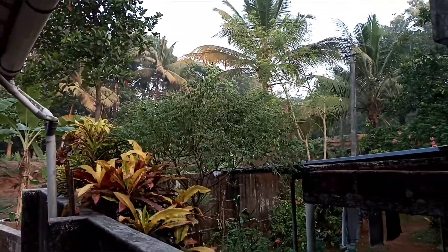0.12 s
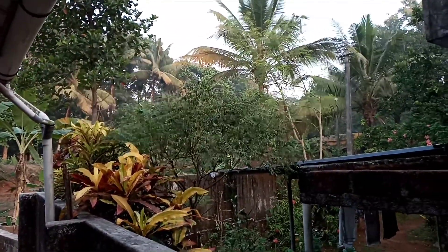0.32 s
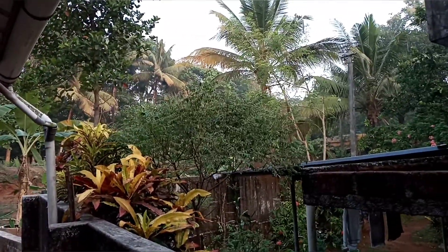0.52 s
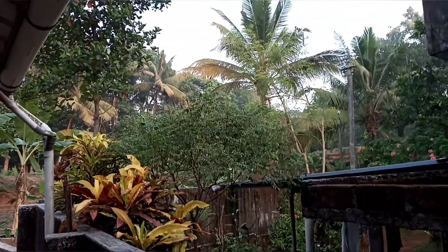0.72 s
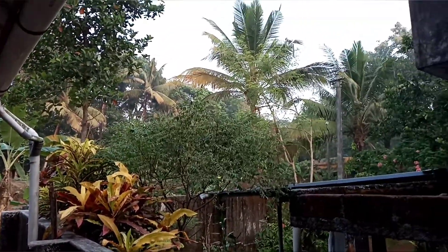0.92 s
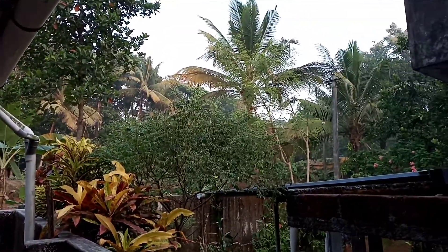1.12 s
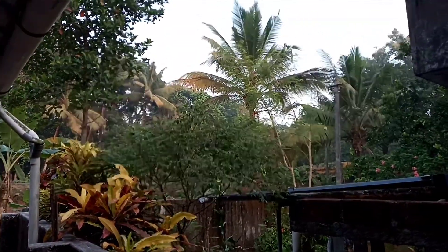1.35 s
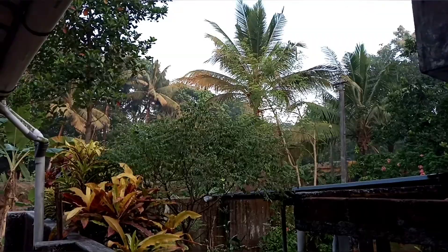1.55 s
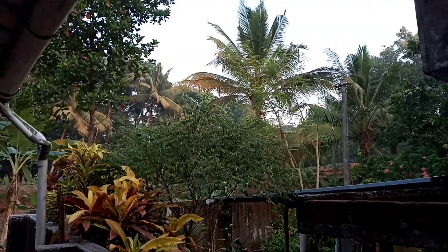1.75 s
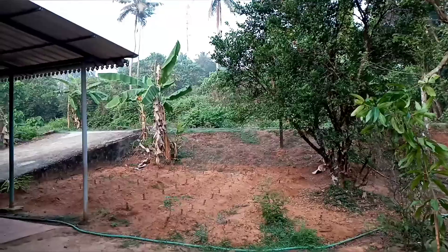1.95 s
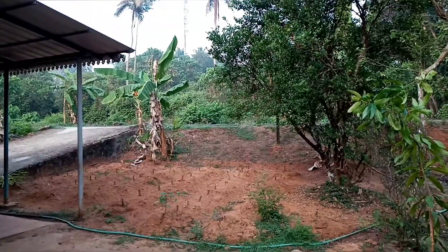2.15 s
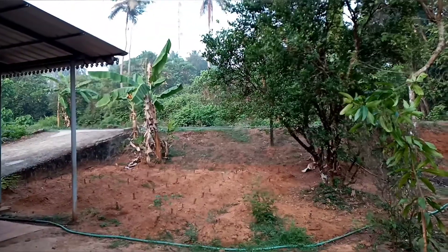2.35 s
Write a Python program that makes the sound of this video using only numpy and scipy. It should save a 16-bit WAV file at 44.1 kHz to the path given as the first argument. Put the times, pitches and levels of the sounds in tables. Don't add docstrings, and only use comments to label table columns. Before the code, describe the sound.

Small birds whistle and chirp in a leafy yard while a finger rubs and taps the phone

```python
import sys
import numpy as np
from scipy import signal
from scipy.fft import rfft, irfft
from scipy.io import wavfile

SR = 44100
rng = np.random.default_rng(int(sys.argv[2]) if len(sys.argv) > 2 else 0)


def wrap_up_sound(samples):
    columns = np.atleast_2d(samples).T
    tamed = np.clip(columns, -1, 1)
    steps = np.round(tamed * 32767).astype(np.int16)
    wavfile.write(sys.argv[1], SR, steps)


def magnitude_from_level(level_db):
    exponent = np.asarray(level_db, float) / 20
    return 10 ** exponent


N = 108045
CHANGE_S = 1.92
BURR = .8


def t():
    return np.arange(N) / SR


def rms_one(x):
    return x / np.sqrt(np.mean(x ** 2) + 1e-20)


def drift(rate_hz, size=N):
    r = np.exp(-2 * np.pi * rate_hz / SR)
    wander = signal.lfilter([1], [1, -2 * r, r * r], rng.standard_normal(size + SR))
    return rms_one(wander[SR:])


def band(x, low_hz, high_hz, order=2):
    limits = [low_hz, min(high_hz, .45 * SR)]
    return signal.sosfilt(signal.butter(order, limits, "band", fs=SR, output="sos"), x)


def noise_band(low_hz, high_hz, order=2):
    return rms_one(band(rng.standard_normal(N), low_hz, high_hz, order))


def colour(x, points):
    hz, db = np.transpose(points)
    grid = np.maximum(np.arange(N // 2 + 1) * SR / N, 1)
    gain = magnitude_from_level(np.interp(np.log(grid), np.log(hz), db))
    return rms_one(irfft(rfft(x) * gain, N))


def ring(x, hz, t60):
    r = magnitude_from_level(-60 / (t60 * SR))
    w = 2 * np.pi * hz / SR
    return signal.lfilter([0, np.sin(w)], [1, -2 * r * np.cos(w), r * r], x + 1e-18)


def grains(per_s, spread_db):
    happens = rng.random(N) < per_s / SR
    size = magnitude_from_level(spread_db * np.minimum(rng.exponential(1, N), 4))
    return happens * size * rng.choice([-1, 1], N)


def gate(start, length, edge):
    to_edge = np.minimum(t() - start, start + length - t())
    return np.sin(np.pi / 2 * np.clip(to_edge / edge, 0, 1)) ** 2


def levelled(rows, levels_db):
    return [(*row, db) for row, db in zip(rows, levels_db)]


def glides(rows):
    out = 0
    waver = magnitude_from_level(2 * drift(50))
    for start, length, from_hz, to_hz, db in rows:
        hz = np.interp(t(), [start, start + length], [from_hz, to_hz])
        tone = np.sin(2 * np.pi * np.cumsum(hz) / SR)
        out = out + np.sqrt(2) * magnitude_from_level(db) * gate(start, length, 0.0028) * tone
    return out * waver


def air():
    # f/Hz, level/dB
    air_colour = [(25, -33), (70, 2), (190, -1), (330, -17.5), (650, -11), (2000, -13.5), (3800, -19),
                  (8000, -44)]
    hiss = colour(rng.standard_normal(N), air_colour)
    edges = 20 * 2. ** np.arange(11)
    octaves = [band(hiss, low, high) * magnitude_from_level(drift(7.6)) for low, high in zip(edges, edges[1:])]
    return magnitude_from_level(-64) * sum(octaves)


def motor():
    hum_hz, width_hz = 181.4, 22.3
    return magnitude_from_level(-73) * noise_band(hum_hz - width_hz / 2, hum_hz + width_hz / 2)


def traffic():
    murmur_hz, width_hz = 300.4, 144
    swell = magnitude_from_level(-74 + 1.5 * drift(8.5))
    return swell * noise_band(murmur_hz - width_hz / 2, murmur_hz + width_hz / 2)


def wind():
    # t/s, level/dB
    gusts = [
        (1.92, -54.5),
        (2.06, -67),
        (2.12, -62),
        (2.28, -62),
        (2.45, -70.5),
    ]
    strength = magnitude_from_level(np.interp(t(), *np.transpose(gusts)) + 0.5 * drift(13))
    return strength * noise_band(47, 136)


def insects():
    # f/Hz, width/Hz, level/dB, throb rate/Hz, throb depth/dB, time of one throb peak/s
    insect_bands = [(4693, 420, -73, 0.97, -0.5, 0.13), (6228, 247, -66.5, 6.3, -0.5, 0.34),
                    (6607, 120, -69.5, 9.0, 2, 0.08), (7893, 220, -74.5, 10.9, 7.0, 0.544),
                    (7540, 570, -76, 3.8, 1, 0.15), (9020, 110, -77.5, 11, 3.5, 0.56),
                    (8864, 390, -72, 18, 3, 0.065), (9190, 55, -74, 11, 4, .48),
                    (6316, 20, -73, 5.02, 0.5, .45), (9096, 720, -66.5, 10.6, 2, 0.459)]
    out = 0
    for hz, width_hz, db, rate, depth_db, peak_s in insect_bands:
        clicks = grains(5800, 0.69)
        song = rms_one(band(clicks, hz - width_hz / 2, hz + width_hz / 2))
        throb_db = depth_db * np.cos(2 * np.pi * rate * (t() - peak_s))
        out = out + song * magnitude_from_level(db + throb_db + 2.5 * drift(3.35))
    return out


def linger():
    # start t/s, low f/Hz, high f/Hz, time to fade 60 dB/s
    hanging = [(0.0, 1700, 2150, 1.0), (.33, 1400, 2450, 1.2), (.63, 1500, 2300, 1.3),
               (1.92, 1600, 2400, 1.5), (1.92, 2600, 3700, .5), (2.15, 1500, 2400, 1.3),
               (.72, 3000, 3800, .8), (1.72, 900, 2000, .4), (.735, 4900, 7300, .3), (.685, 5900, 6800, .6),
               (1.07, 5100, 6800, .6), (1.73, 250, 480, .9), (1.93, 1000, 1600, .8), (1.66, 2400, 3750, .5),
               (.2, 2700, 3750, .4), (.88, 2650, 2980, .9), (2.075, 3850, 4200, .9), (2.19, 4200, 5100, .6),
               (1.67, 3600, 3780, .8), (.745, 3550, 3750, .8)]
    hanging_db = [-67.5, -53.5, -52, -57, -67.5, -67, -69, -66, -56.5, -61.5, -62.5, -63, -75.5, -67, -67,
                  -65, -71, -74, -70, -68.5]
    out = 0
    for s, low_hz, high_hz, t60, db in levelled(hanging, hanging_db):
        fade_db = db - 60 * np.maximum(t() - s, 0) / t60
        fade = magnitude_from_level(fade_db + 2.0 * drift(22)) * gate(s, 3, 0.0046)
        out = out + fade * noise_band(low_hz, high_hz, order=5)
    return out


def crow():
    # t/s, f/Hz
    pitch = [
        (2.033, 505),
        (2.06, 538),
        (2.095, 550),
        (2.14, 536),
        (2.195, 505),
    ]
    # multiple of the pitch, level/dB
    partials = [(2, -67.5), (3, -54.5), (4, -50), (5, -88)]
    hz = np.interp(t(), *np.transpose(pitch)) + 7 * drift(152)
    phase = 2 * np.pi * np.cumsum(hz) / SR
    voice = 0
    for multiple, db in partials:
        rough = 1 + .4 * drift(130)
        voice = voice + np.sqrt(2) * magnitude_from_level(db) * np.sin(round(multiple) * phase) * rough
    return voice * gate(2.033, .165, .026)


def buzzer():
    # start t/s, length/s, level/dB
    rasps = [
        (0.696, 0.051, -67.5),
        (0.828, 0.13, -57),
        (1.042, 0.14, -55),
        (1.263, 0.08, -69.5),
        (1.45, 0.091, -69),
        (1.672, 0.15, -70.5),
    ]
    throat = rms_one(band(grains(1500, 0.94), 4190, 4960, order=3))
    return throat * sum(magnitude_from_level(db) * gate(s, length, 0.41 * length) for s, length, db in rasps)


def chirper():
    # start t/s, top f/Hz, level/dB
    chirps = [
        (0.189, 3682, -61),
        (0.74, 3600, -67),
        (1.034, 3840, -66),
        (1.649, 3716, -67.5),
    ]
    hold_s, fall_s = 0.019, 0.031
    held = [(s, hold_s, hz, hz * .97, db) for s, hz, db in chirps]
    held += [(s, hold_s * 2.1, 2 * hz, 2 * hz * .93, db - 3) for s, hz, db in chirps]
    drops = [(s + hold_s / 2, fall_s, hz, hz * .7, db - 10) for s, hz, db in chirps]
    return glides(held) * (1 + BURR * drift(150)), glides(drops)


def pipers():
    # start t/s, length/s, from f/Hz, to f/Hz
    piped = [(.555, .03, 2930, 3050), (.578, .05, 3080, 3130), (.635, .07, 3100, 3120),
             (.843, .055, 2690, 2760), (.895, .075, 2800, 2850), (.965, .07, 2830, 2770),
             (1.17, .05, 2500, 2450), (1.255, .025, 2330, 2310), (1.455, .09, 3510, 3500),
             (2.06, .03, 3900, 3980), (1.925, .1, 3620, 3580), (1.09, .07, 2200, 2200),
             (2.19, .17, 2580, 2600), (1.44, .06, 6800, 7000), (1.25, .1, 3000, 3350),
             (1.3, .04, 2450, 2150), (2.17, .055, 3900, 3850), (.63, .27, 2240, 2200),
             (1.89, .028, 5600, 5550), (1.0, .18, 1900, 1800)]
    piped_db = [-75, -69, -78, -66.5, -65, -71.5, -70.5, -67.5, -76, -73, -76.5, -72, -75, -68, -78.5, -71,
                -75.5, -69, -79, -75.5]
    return glides(levelled(piped, piped_db)) * (1 + BURR * drift(84))


def whistler():
    # start t/s, length/s, from f/Hz, to f/Hz
    whistled = [(0.0, .035, 1500, 1490), (.045, .07, 1500, 1500), (.153, .03, 1975, 1945),
                (.178, .016, 1930, 1740), (.19, .028, 1730, 1720), (.215, .02, 1740, 1880),
                (.23, .075, 1885, 1895), (.473, .04, 2050, 2210), (.508, .05, 2240, 2235),
                (.559, .018, 2190, 2160), (.576, .015, 2170, 2150), (.592, .024, 2090, 2070),
                (.616, .018, 2050, 2000), (.625, .03, 1900, 1600), (.65, .045, 1600, 1390),
                (.7415, .026, 1545, 1510), (.784, .034, 1520, 1520), (.825, .03, 1520, 1520),
                (.905, .04, 1520, 1520), (.955, .035, 1810, 1820), (1.853, .024, 2010, 2010),
                (1.874, .018, 2010, 1980), (1.885, .035, 1900, 1760), (.372, .15, 1480, 1510)]
    whistled_db = [-55.5, -63, -57.5, -49, -54.5, -71, -51.5, -55, -51.5, -53.5, -44.5, -48, -48.5, -62.5,
                   -67, -47, -49, -61, -71, -60, -60, -52, -56.5, -68]
    return glides(levelled(whistled, whistled_db))


def echoes(x):
    age = np.arange(SR) / SR
    clumps = rng.standard_normal(SR) * magnitude_from_level(1.5 * drift(52, size=SR))
    far_trees = magnitude_from_level(-60 * age / 0.95)
    near_trees = magnitude_from_level(13 - 60 * age / 0.11)
    tail = clumps * (far_trees + near_trees) * (age > 0.0053)
    tail = tail / np.sqrt(np.sum(tail ** 2))
    return magnitude_from_level(-2) * signal.fftconvolve(x, tail)[:N] * (1 + 0.14 * drift(45))


def finger_rub(slips):
    # t/s, level/dB
    pressure = [
        (0.253, -49.5),
        (0.265, -40),
        (0.283, -35),
        (0.34, -35.5),
        (0.341, -37),
        (0.358, -42),
        (.372, -45.5),
        (0.38, -49),
    ]
    # f/Hz, level/dB
    rub_colour = [(400, -19), (950, -15), (1400, -3), (2900, -1), (4900, -14), (6500, -13), (11000, -52),
                  (15400, -35)]
    s, db = np.transpose(pressure)
    rub = band(colour(slips, rub_colour), 110, 18000, order=1)
    dull_hz, dulls_s = 4400, .335
    treble = signal.sosfilt(signal.butter(3, dull_hz, "high", fs=SR, output="sos"), rub)
    bass = signal.sosfilt(signal.butter(3, dull_hz, fs=SR, output="sos"), rub)
    rub = bass + treble * np.interp(t(), [dulls_s, dulls_s + 0.0044], [1, .3])
    return rub * magnitude_from_level(np.interp(t(), s, db, left=-120, right=-120))


def skin_brushes(slips):
    # start t/s, length/s, low f/Hz, high f/Hz
    brushes = [
        (.353, .016, 4300, 6800),
        (.491, .017, 1150, 3300),
        (2.182, .007, 4200, 5400),
        (.36, .02, 1200, 4500),
    ]
    brushes_db = [-45, -55, -56, -58]
    out = 0
    for s, length, low_hz, high_hz, db in levelled(brushes, brushes_db):
        skin = rms_one(band(slips, low_hz, high_hz, order=3))
        out = out + skin * magnitude_from_level(db) * gate(s, length, length / 3)
    return out


def case_taps():
    # t/s, thump level/dB, click level/dB, click f/Hz
    taps = [
        (0.6562, -37, -70, 1240),
        (1.7145, -30.5, -28.5, 1290),
        (1.816, -47.5, -70, 1300),
        (1.918, -48.5, -57, 2970),
        (2.171, -99, -45, 2460),
        (2.443, -46, -77, 1324),
    ]
    soft = signal.butter(4, 520, fs=SR, output="sos")
    out = 0
    for s, thump_db, click_db, click_hz in taps:
        tap = 1. * (np.arange(N) == int(s * SR))
        thump = signal.sosfilt(soft, band(ring(tap, 355, .028), 70, 900, order=1))
        click = ring(tap, click_hz, 5.5 / click_hz)
        click = band(click, click_hz / 1.35, min(click_hz * 2, 6500), order=1 + (click_hz > 1600))
        out = out + magnitude_from_level(thump_db) * thump - magnitude_from_level(click_db) * click
    return out


def handling():
    slips = grains(15000, 2.5)
    return finger_rub(slips) + skin_brushes(slips) + case_taps()


def scene():
    first = t() < CHANGE_S
    second = ~first
    held, drops = chirper()
    birds = whistler() + pipers() + held + buzzer() + crow()
    first_echoes = echoes((birds + drops) * first) * first
    second_echoes = 0.67 * echoes(birds * second)
    far = birds + first_echoes + second_echoes + linger()
    far = far + (motor() + traffic()) * first + wind() * second
    far = far + insects() * magnitude_from_level(-7 * second) + air() * magnitude_from_level(-3 * second)
    treble_cut = signal.cheby2(10, 50, 9855 * 1.106, fs=SR, output="sos")
    mid = handling() + signal.sosfilt(treble_cut, far)
    return np.array([mid, mid])


def top_cut(x):
    return signal.sosfilt(signal.butter(12, 15990, fs=SR, output="sos"), x)


def record(dry):
    low = signal.sosfilt(signal.butter(2, 40, "high", fs=SR, output="sos"), dry)
    port_hz = 15150
    port = noise_band(port_hz - 700, port_hz + 700) * magnitude_from_level(-88.5 + 1.5 * drift(8))
    hiss_db = -101 + 6 * (t() > CHANGE_S) + 1.6 * drift(6)
    hiss = noise_band(11000, 12000, order=1) * magnitude_from_level(hiss_db)
    side = magnitude_from_level(-95) * noise_band(15000, 15700) * np.array([[1], [-1]])
    top = signal.cheby2(16, 40, 16050, fs=SR, output="sos")
    return top_cut(signal.sosfilt(top, low + port + hiss + side))


dry = scene()
out = record(dry)
wrap_up_sound(out)
```